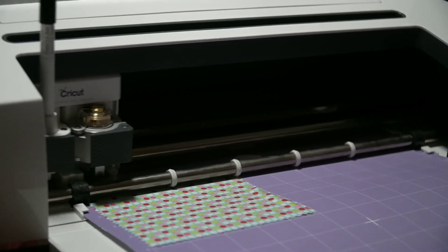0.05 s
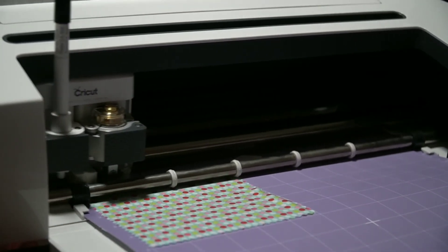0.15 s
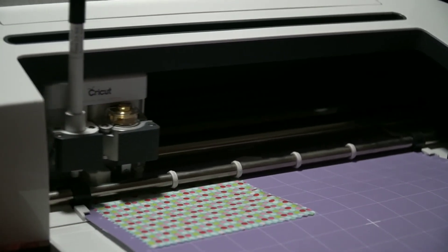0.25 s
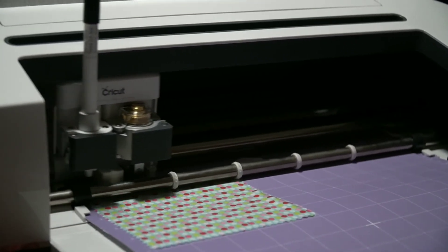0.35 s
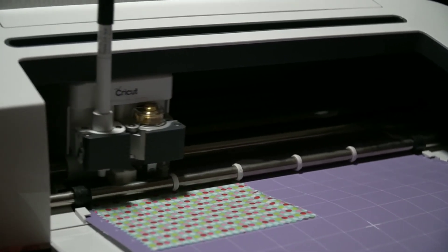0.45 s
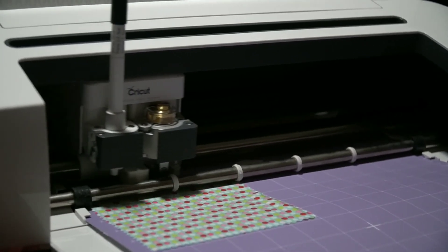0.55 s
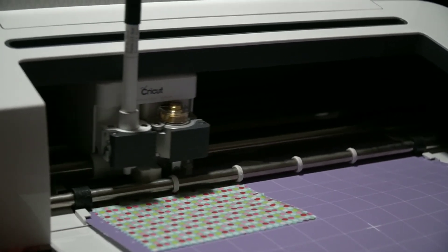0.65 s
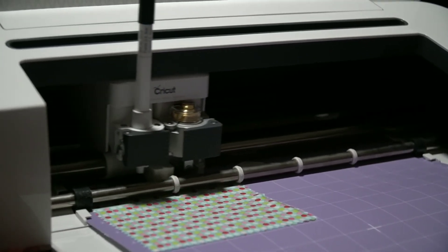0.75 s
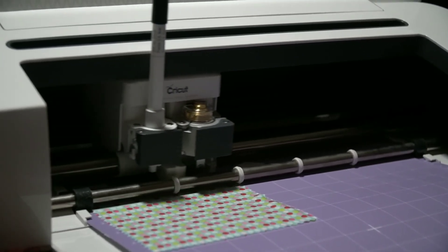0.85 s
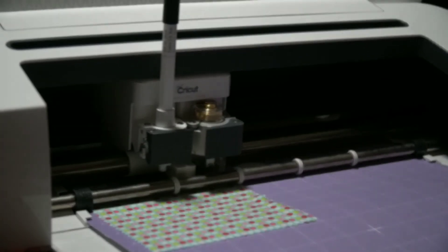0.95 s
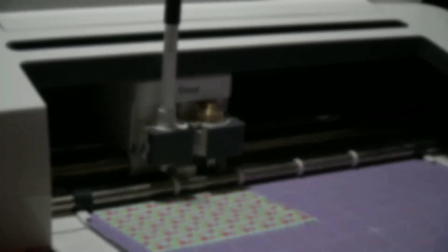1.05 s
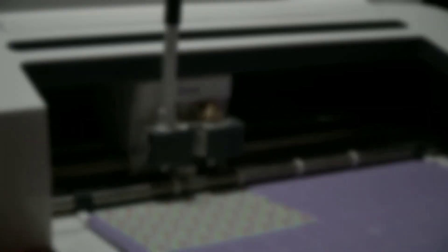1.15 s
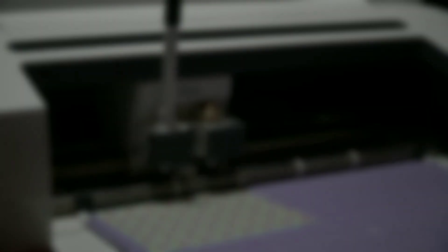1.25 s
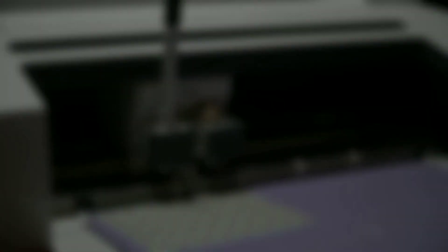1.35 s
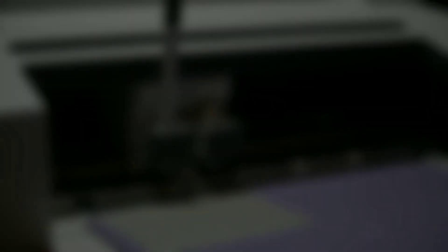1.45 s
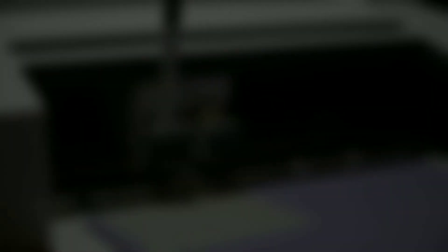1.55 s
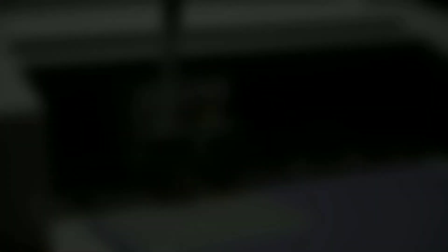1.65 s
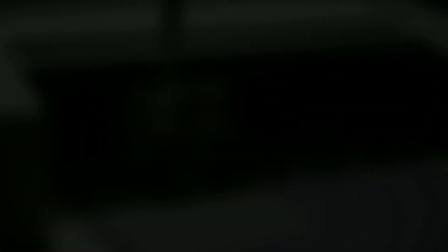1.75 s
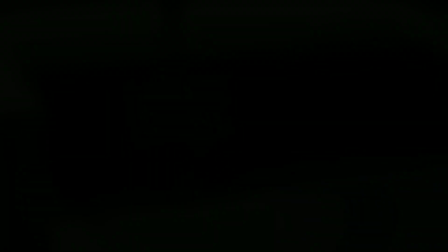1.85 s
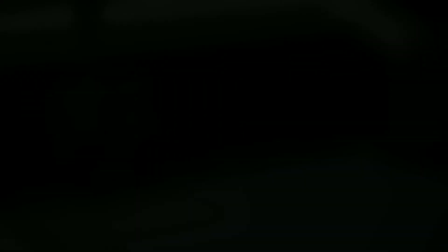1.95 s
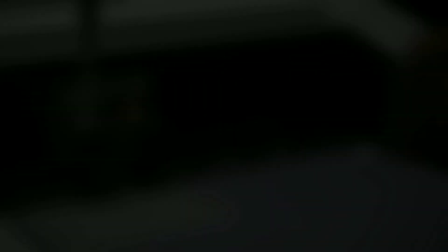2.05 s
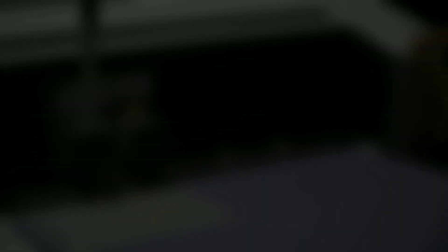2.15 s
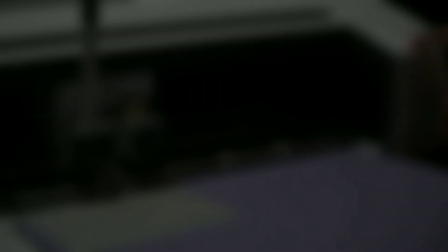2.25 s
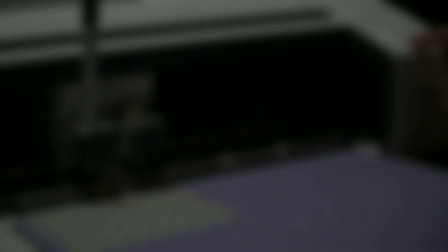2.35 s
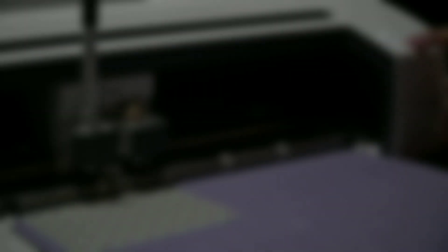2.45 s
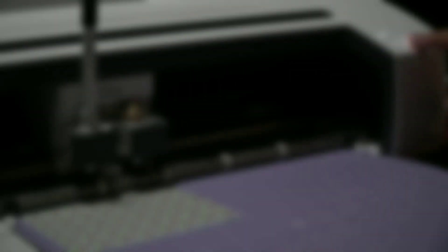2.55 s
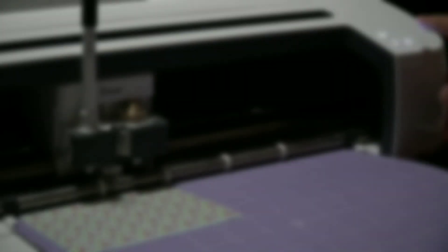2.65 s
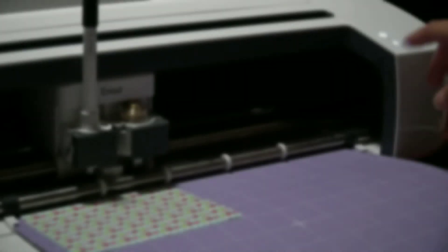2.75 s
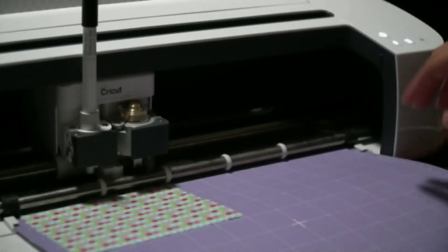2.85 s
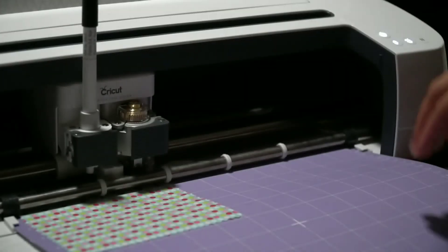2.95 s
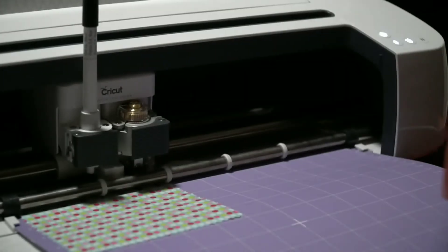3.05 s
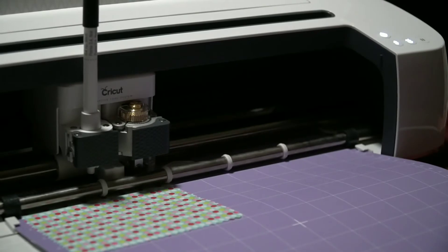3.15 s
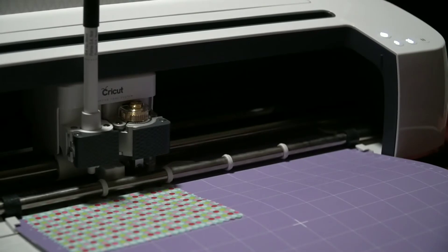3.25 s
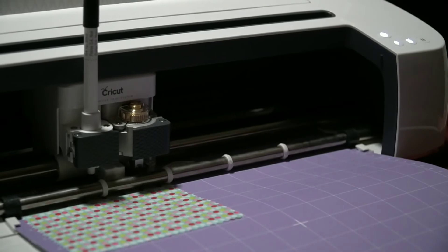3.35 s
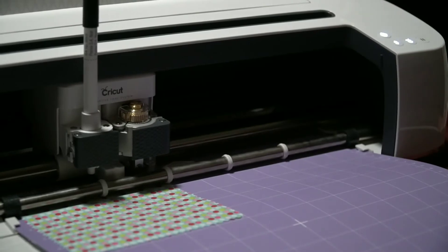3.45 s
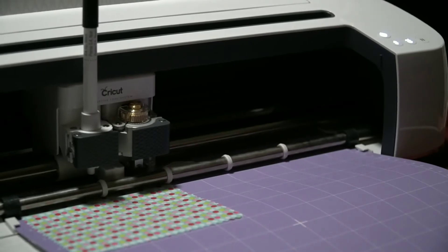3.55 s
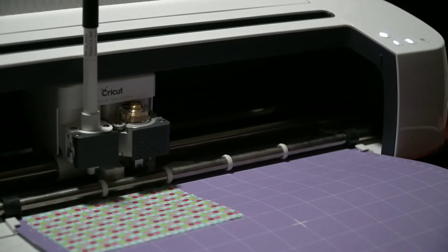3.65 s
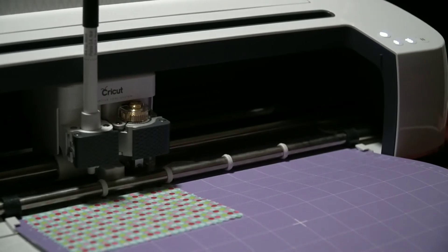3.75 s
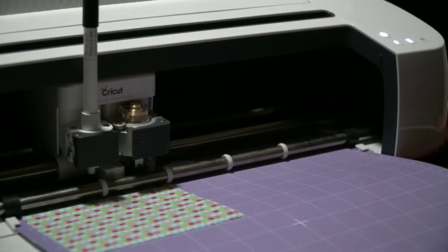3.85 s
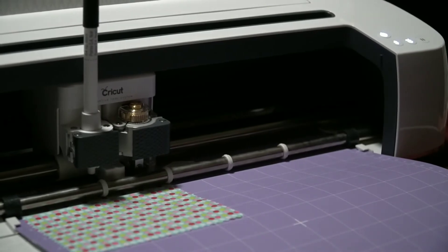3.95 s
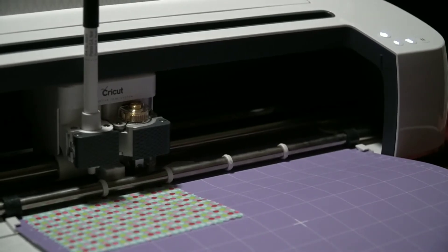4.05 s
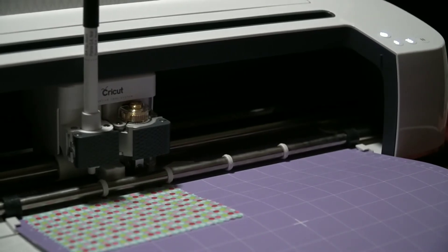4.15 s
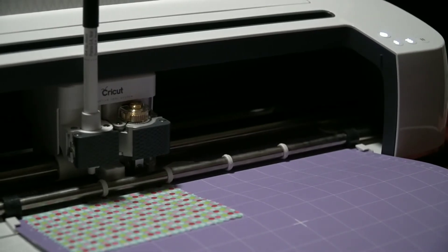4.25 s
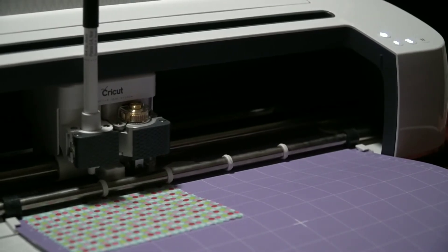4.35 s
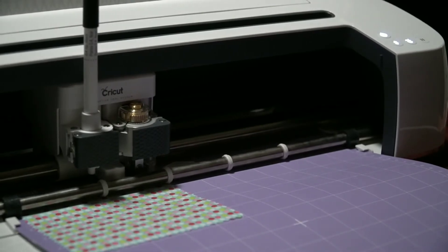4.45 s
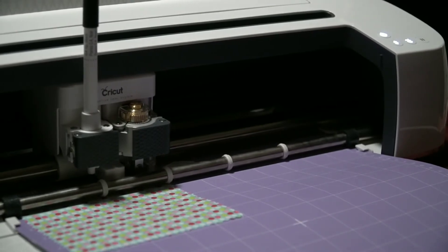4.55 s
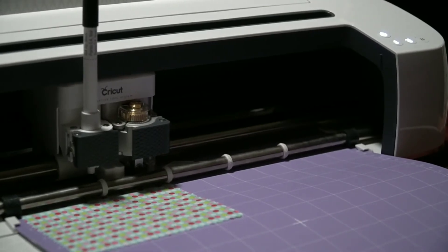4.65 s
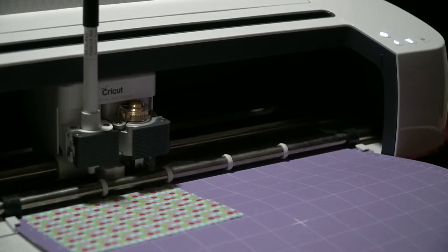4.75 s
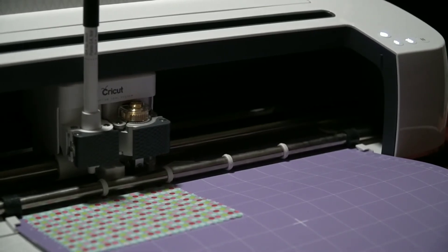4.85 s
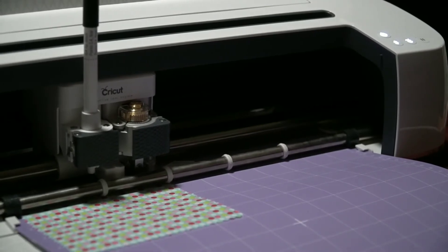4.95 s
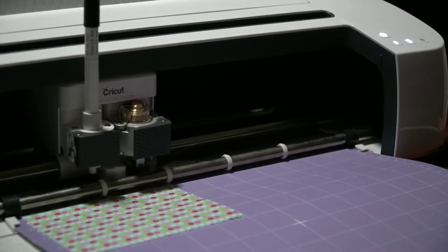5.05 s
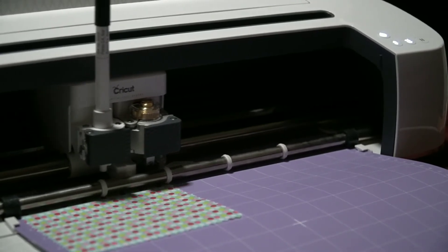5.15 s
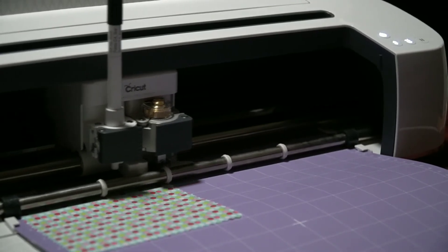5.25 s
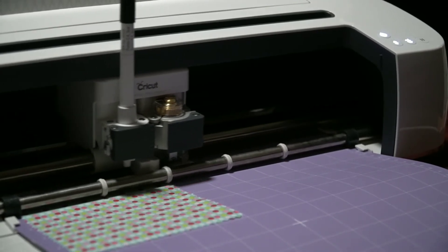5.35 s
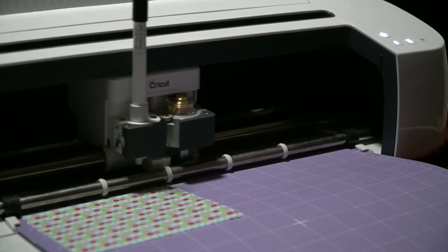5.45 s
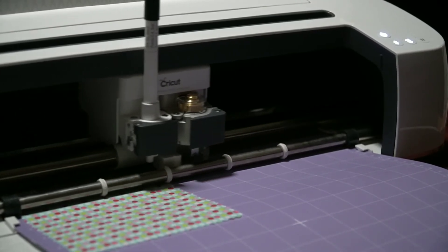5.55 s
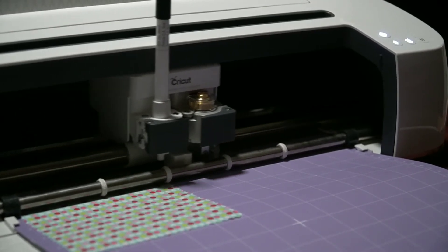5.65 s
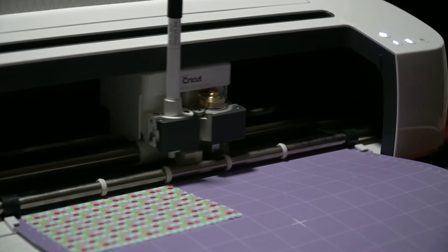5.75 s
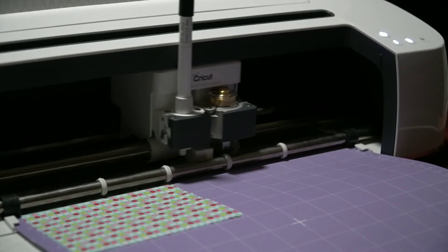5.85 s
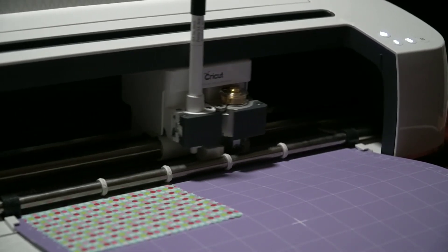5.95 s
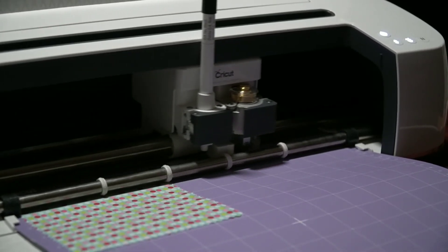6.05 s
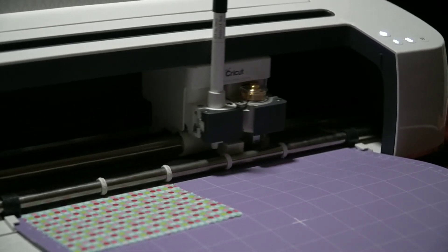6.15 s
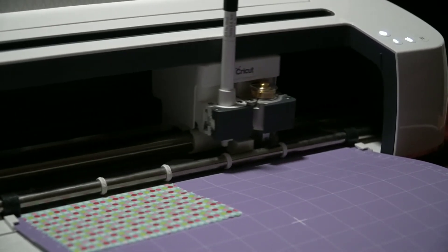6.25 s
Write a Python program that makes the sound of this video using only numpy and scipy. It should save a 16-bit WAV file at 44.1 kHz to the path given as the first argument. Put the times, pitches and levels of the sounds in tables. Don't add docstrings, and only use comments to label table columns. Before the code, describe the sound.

A small geared motor whirs and rattles for a second, stops, a button clicks down and up, then it runs again over hum and crickets.

```python
import sys
import numpy as np
from scipy import signal
from scipy.io import wavfile

SR = 44100
rng = np.random.default_rng(int(sys.argv[2]) if len(sys.argv) > 2 else 0)


def gain_from_decibels(decibels):
    exponent = np.asarray(decibels, float) / 20
    return 10 ** exponent


def persist_wave(psi):
    counts = np.round(np.clip(psi, -1, 1) * 32767).astype(np.int16)
    wavfile.write(sys.argv[1], SR, np.atleast_2d(counts).T)


N = 277389
T = np.arange(N) / SR
SECOND_RUN = T > 3
SCENE_CHANGE_S = 1.949

# [time_s, share_of_full_speed]
SPEED = [(0, .3), (.09, 1.0), (.97, 1.0), (1.12, .2), (5.06, .2), (5.18, 1.0), (6.3, 1.0)]


def rms_one(x):
    return x / np.sqrt(np.mean(x ** 2) + 1e-20)


def in_time(rows):
    s, *columns = np.transpose(rows)
    return [np.interp(T, s, column) for column in columns]


def at_hz(points, hz):
    point_hz, value = np.array(points).T
    return np.interp(np.log(hz), np.log(point_hz), value)


def drift(rate):
    r = np.exp(-80 * np.pi * rate / SR)
    slow = signal.lfilter([1], [1, -2 * r, r * r], rng.standard_normal(N // 40 + 2002))
    slow = slow[2000:]
    return np.interp(np.arange(N) / 40, np.arange(len(slow)), rms_one(slow))


def resonate(x, hz, width):
    r = np.exp(-np.pi * width / SR)
    b = np.array([1, 0, -1]) * (1 - r * r) / 2
    return signal.lfilter(b, [1, -2 * r * np.cos(2 * np.pi * hz / SR), r * r], x)


def pair(alike):
    mid, side = rng.standard_normal((2, N))
    return np.sqrt((1 + alike) / 2) * mid + np.sqrt((1 - alike) / 2) * side * [[1], [-1]]


def room(x, t60, wet_db):
    t = np.arange(SR // 2) / SR
    mid, side = rng.standard_normal((2, len(t))) * gain_from_decibels(-60 * t / t60) * (t > .004)
    side = signal.sosfilt(signal.butter(1, 2000, "high", fs=SR, output="sos"), side)
    tail = signal.lfilter([.5], [1, -.5], mid + side * [[1], [-1]])
    tail = tail / np.sqrt(np.sum(tail ** 2) / 2)
    wet = signal.fftconvolve(np.broadcast_to(x, (2, N)), tail, axes=1)[:, :N]
    return x + gain_from_decibels(wet_db) * wet


def load():
    # [full_speed_s, power_off_s, level_db, rise_db_per_s, sag_db_per_s]
    runs = [
        (0.078, 1.006, -32.5, 77, .5),
        (5.16, 6.4, -32, 266, 1.5),
    ]
    coast_db_per_s = 196
    level = 0
    for full, off, db, rise, sag in runs:
        starting = rise * np.maximum(full - T, 0)
        sagging = sag * np.maximum(T - full, 0)
        coasting = coast_db_per_s * np.maximum(T - off, 0)
        level = level + gain_from_decibels(db - starting - sagging - coasting)
    return level


def gear_whine(turns):
    multiples = [11, 21, 22, 27, 29, 30.3, 33, 35, 38, 42, 44, 46, 49, 51, 55, 56, 64.4, 67.4, 73, 75, 77,
                 80.6, 83, 87, 90, 97]
    # [first_run_db, second_run_db]
    whine_db = [(-58, -55.5), (-71, -52), (-50, -53), (-79, -51), (-70, -56), (-71, -53.5), (-46, -48.5),
                (-59, -55), (-51, -57), (-54, -66), (-42, -43), (-73, -53), (-53, -50.5), (-45, -45.5),
                (-42, -45.5), (-54, -50), (-50, -50), (-55, -49.5), (-73, -50.5), (-52, -54), (-55, -47),
                (-54, -60), (-51.5, -63), (-55, -70), (-58, -74), (-65, -82)]
    out = 0
    for multiple, (first_db, second_db) in zip(multiples, whine_db):
        flutter_db = (0.53 + 0.035 * multiple) * drift(9.8)
        level = gain_from_decibels(np.where(SECOND_RUN, second_db, first_db) + flutter_db)
        wander = rng.random() + 0.0014 * multiple * drift(19.4)
        out = out + level * np.sin(2 * np.pi * (multiple * turns + wander))
    return np.sqrt(2) * out * load() / gain_from_decibels(-32.5)


def housing(turns):
    # [pitch_hz, width_hz, level_db]
    shell_modes = [(567, 220, -9), (758, 48, -4), (1087, 115, -1), (1315, 52, -3), (1400, 50, 2.5),
                   (1491, 58, 0.5), (1609, 71, 5), (1705, 107, 3), (1890, 83, 4.5), (2160, 226, -4),
                   (2217, 105, -6), (2454, 130, -3), (2500, 510, -9.5)]
    mesh = 1 + 0.87 * np.cos(2 * np.pi * 11 * turns)
    twice_a_turn = 1 + 0.2 * np.cos(4 * np.pi * turns)
    shake = pair(alike=0.98) * mesh * twice_a_turn * gain_from_decibels(1.0 * drift(47) + .5 * drift(12))
    tilt = np.where(SECOND_RUN, 1.2, -4.5)
    out = 0
    for k, (hz, width, db) in enumerate(shell_modes):
        level = gain_from_decibels(db + tilt * np.log2(hz / 1400) + 1.05 * drift(3.5))
        out = out + (-1) ** k * level * resonate(shake, hz, width)
    return gain_from_decibels(-4) * load() * rms_one(out)


def run_up():
    # [start_s, length_s, pitch_hz, level_db]
    notes_sung = [
        (0.049, 0.029, 1277, -37),
        (0.071, 0.048, 1378, -31.5),
        (0.019, 0.063, 754, -45.5),
        (1.04, 0.035, 1415, -54),
        (5.115, 0.013, 1880, -36.5),
        (5.125, 0.069, 1394, -38),
        (5.151, 0.057, 1720, -37),
    ]
    out = 0
    for s, length, hz, db in notes_sung:
        swell = np.sin(np.pi * np.clip((T - s) / length, 0, 1))
        out = out + gain_from_decibels(db) * swell * np.sqrt(2) * np.sin(2 * np.pi * hz * T)
    return out


def ticks():
    # [first_tick_s, last_tick_s, peak_db, fade_db_per_s]
    tick_runs = [
        (0.066, .07, -39.5, 0),
        (.0841, .965, -32.5, 4),
        (0.987, 0.986, -40, 0),
        (5.152, 5.157, -47.5, 0),
        (5.176, 6.28, -36, 3.3),
    ]
    ticks_per_s, jitter_s, spread_db = 50.2, .0009, 4
    times, peaks = [], []
    for first, last, db, fade in tick_runs:
        since = np.arange(0, last - first, 1 / ticks_per_s)
        times.append(first + since)
        peaks.append(db - fade * since)
    s, peak_db = np.concatenate(times), np.concatenate(peaks)
    late, strong = rng.standard_normal((2, len(s)))
    return s + jitter_s * late, peak_db + spread_db * np.minimum(strong, 1)


def rattle():
    # [pitch_hz, width_hz]
    rail_modes = [(3230, 200), (4170, 300), (4960, 280), (5900, 600), (7250, 800), (8700, 1000),
                  (10100, 750), (10900, 700)]
    # [sliding_hiss_db, tick_db]
    rail_drive = [(5, 3), (-8, 16.5), (1.5, 13), (-21, 6), (-20, 12.5), (-25, 8), (-7.5, 17.5), (0, 14)]
    s, peak_db = ticks()
    colour = rng.standard_normal((len(s), len(rail_modes)))
    bed = load() * in_time(SPEED)[0] ** 2 * gain_from_decibels(np.where(SECOND_RUN, -10.0, -7.0))
    white, out = pair(alike=0.55), 0
    fall = np.exp(-1 / (0.0011 * SR))
    for k, ((hz, width), (hiss_db, tick_db)) in enumerate(zip(rail_modes, rail_drive)):
        taps = np.zeros(N)
        tap_db = -34 + (peak_db + 34) * min(hz / 9000, 1) + 2.2 * colour[:, k]
        taps[np.round(s * SR).astype(int)] = gain_from_decibels(tap_db)
        burst = signal.lfilter([1 - fall], [1, -2 * fall, fall * fall], taps + 1e-18)
        drive = white * (gain_from_decibels(hiss_db) * bed + gain_from_decibels(tick_db) * burst)
        out = out + resonate(resonate(drive, hz, width), hz, 1.6 * width) * (-1) ** k
    return out + gain_from_decibels(-6) * bed * resonate(pair(alike=0.45), 6300, 11000)


def clicks():
    # [start_s, peak_db, low_thump_db]
    presses = [
        (2.378, -27.5, -19.5),
        (2.5696, -24, -11.5),
        (2.6248, -40, -40),
        (5.0828, -40, -43),
        (5.109, -41, -46),
        (5.1469, -56, -30),
    ]
    # [pitch_hz, level_db, t60_s]
    button_modes = [(513, 3.5, 0.02), (783, -12.5, 0.025), (1085, -4, 0.012), (1415, -14.5, 0.036),
                    (2040, -5, 0.0086), (2200, -5.5, 0.014), (1280, -13.5, 0.034), (1676, -6.5, 0.013),
                    (2050, -15, 0.025), (2570, -13.5, 0.028), (2810, -15, 0.014), (3480, -23, 0.011),
                    (4600, -22, 0.015), (10000, -17, 0.006)]
    out = np.zeros(N)
    t = np.arange(SR // 8) / SR
    for s, peak_db, thump_db in presses:
        crack, rub = rng.standard_normal((2, len(t)))
        hit = gain_from_decibels(peak_db - 8.5) * crack * np.exp(-t / 0.0052)
        hit += gain_from_decibels(peak_db - 13) * resonate(rub, 1500, 2200) * np.exp(-t / 0.038)
        for hz, db, t60 in button_modes:
            if hz < 900:
                rise = (1 - np.exp(-t / 0.0034)) ** 3
                mode_db = db + thump_db + 11
            else:
                rise = 1 - np.exp(-t / 0.0023)
                mode_db = db + peak_db + 12.0
            ring = gain_from_decibels(mode_db - 60 * t / t60) * rise
            hit += ring * np.sin(2 * np.pi * (hz * t + rng.random()))
        out[round(s * SR):][:len(t)] += hit
    return out


def crickets():
    # [pitch_hz, width_hz, level_db, lag_chirp_turns, left_minus_right_db]
    voices = [
        (6322, 380, -2, -0.046, 1),
        (6120, 220, -5, 0.079, 3),
        (5795, 600, -3.5, 0.026, 1.5),
        (5450, 100, -19.5, 0.42, 10),
    ]
    # [time_s, level_db]
    chorus_db = [(0.0, -54), (5.0, -52), (5.25, -53.5), (6.29, -52)]
    # [time_s, swell_db]
    chorus_swell = [(0, 4), (1.5, 5.5), (3.0, 4.5), (4.0, 1.5), (5.0, 5), (6.3, 5)]
    # [chirp_turns, pitch_hz, level_db]
    strokes = [
        (-.24, 6350, -62),
        (-.12, 6450, -51),
        (-.005, 6330, -52),
        (.11, 6050, -57),
        (.225, 5800, -60),
    ]
    # [time_s, late_chirp_turns]
    near_late = [(0, 0), (1.1, 0), (1.9, .05), (1.95, 0), (3.3, 0), (4.34, .11), (4.8, .07), (6.3, .07)]
    chirp_hz = 6.8
    chirp = chirp_hz * T + np.where(T < SCENE_CHANGE_S, .42, .51)
    chorus, near = 0, 0
    for hz, width, db, lag, pan_db in voices:
        phase = chirp - lag + 0.02 * drift(1.9)
        swell = gain_from_decibels(in_time(chorus_swell)[0] * np.cos(2 * np.pi * phase) + 1.0 * drift(1.4))
        voice = resonate(resonate(pair(alike=0.19) * swell, hz, width), hz, 0.98 * width)
        chorus = chorus + gain_from_decibels(db - 7) * rms_one(voice) * gain_from_decibels([[pan_db / 2], [-pan_db / 2]])
    late = in_time(near_late)[0]
    for turn, hz, db in strokes:
        since = ((chirp - late - turn + .5) % 1 - .5) / chirp_hz
        stroke = gain_from_decibels(db + 3.0 * drift(5)) * np.exp(-(since / .0035) ** 2)
        cycles = hz * T - 9000 * since ** 2 + 1.93 * drift(7.2)
        near = near + stroke * np.sin(2 * np.pi * cycles)
    near = near * gain_from_decibels(4.5) * gain_from_decibels([[1.5], [-1.5]])
    return gain_from_decibels(in_time(chorus_db)[0]) * rms_one(chorus) + room(near, t60=0.24, wet_db=-13)


def mains_hum():
    throb_top_s = np.where(T < SCENE_CHANGE_S, 0.6, 4.4)
    throb = np.cos(2 * np.pi * 1.507 * (T - throb_top_s))
    level = gain_from_decibels(-40 + 2 * throb + 1.08 * drift(7.9))
    phase = np.where(T < SCENE_CHANGE_S, .26, .66)
    return np.sqrt(2) * level * np.cos(2 * np.pi * (120.03 * T + phase))


def fan():
    # [start_s, above_rest_hz]
    surges = [
        (.9, 11),
        (1.96, 17),
    ]
    rest_hz, settle_s, level_db, starved_db = 606.5, .75, -50, -12
    (first_s, first_hz), (second_s, second_hz) = surges
    before = T < second_s
    since = np.maximum(T - np.where(before, first_s, second_s), 0)
    fan_hz = rest_hz + np.where(before, first_hz, second_hz) * np.exp(-since / settle_s)
    starved = np.clip((first_s - T) / 0.13, 0, 1)
    fan_db = level_db + starved_db * starved + 1.06 * drift(2.6) + 2.06 * drift(15.4)
    note = gain_from_decibels(fan_db) * np.sin(2 * np.pi * np.cumsum(fan_hz) / SR)
    return np.sqrt(2) * note * gain_from_decibels([[.5], [-.5]])


def rustle():
    end_s, rise_s, fall_s, level_db = 4.78, .22, .025, -54
    t = T - end_s
    swell = np.exp(np.minimum(t / rise_s, -t / fall_s))
    hiss = signal.sosfilt(signal.butter(2, 3500, "high", fs=SR, output="sos"), pair(alike=.6))
    return gain_from_decibels(level_db + .5 * drift(20)) * swell * hiss


def rumble():
    # [time_s, level_db]
    thuds = [
        (1.33, -83),
        (3.28, -51),
        (4.61, -71),
        (5.38, -62),
        (6.09, -45),
        (6.29, -50),
    ]
    thud_s = 0.071
    low = signal.sosfilt(signal.butter(4, [35, 70], "band", fs=SR, output="sos"), pair(alike=.98))
    level = gain_from_decibels(-59.5)
    for s, db in thuds:
        level = level + gain_from_decibels(db) * np.exp(-((T - s) / thud_s) ** 2)
    return level * rms_one(low)


def room_tone():
    # [pitch_hz, level_db_per_hz]
    tone_spectrum = [(25, -16), (55, -23), (105, 5), (135, -12), (170, -4), (290, -12), (480, -7),
                     (620, -5.5), (1000, -13), (1900, -18.5), (3000, -24.5), (4400, -32.5), (7500, -38),
                     (11000, -35)]
    # [time_s, level_db]
    tone_db = [(0.0, -43), (6.29, -43)]
    # [pitch_hz, share]
    likeness = [(30, 1), (150, 0.99), (500, 0.85), (1500, 0.63), (3000, 0.16), (6000, 0.21), (10000, 0.062)]
    out, edges = 0, 22 * 2 ** np.arange(0, 9.5, 1 / 3)
    white = rng.standard_normal((2, 2, N))
    for k, (low, high) in enumerate(zip(edges, edges[1:])):
        band = signal.butter(2, [low, high], "band", fs=SR, output="sos")
        mid, side = signal.sosfilt(band, white[k % 2])
        hz = np.sqrt(low * high)
        alike = np.clip(at_hz(likeness, hz), 0, 1)
        gain = gain_from_decibels(at_hz(tone_spectrum, hz) + 0.31 * drift(4.4))
        out = out + gain * (np.sqrt(1 + alike) * mid + np.sqrt(1 - alike) * side * [[1], [-1]])
    return gain_from_decibels(in_time(tone_db)[0]) * rms_one(out)


def scene():
    speed = in_time(SPEED)[0]
    turns = np.cumsum(speed) * 25.07 / SR
    right, left = gain_from_decibels([[-.7], [.7]]), gain_from_decibels([[.6], [-.6]])
    machine = (housing(turns) + run_up()) * right + rattle() * left
    whine = gear_whine(turns) * speed ** 8 * right
    near = room(machine, t60=0.15, wet_db=-7.5)
    near = near + room(whine, t60=0.1, wet_db=-10.5)
    near = near + room(clicks(), t60=0.17, wet_db=-8.5)
    return near + crickets() + mains_hum() + fan() + rustle() + rumble() + room_tone()


def band_limit(x):
    return signal.sosfilt(signal.butter(12, 11740, fs=SR, output="sos"), x)


def record(dry):
    top_cut = signal.ellip(12, .3, 20, 11050, fs=SR, output="sos")
    stop_above = signal.cheby2(8, 50, 12300, fs=SR, output="sos")
    mix = signal.sosfilt(np.vstack([top_cut, stop_above]), dry)
    return band_limit(mix)


dry = scene()
out = record(dry)
persist_wave(out)
```